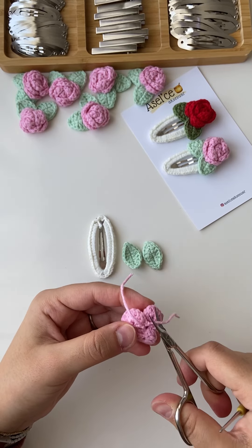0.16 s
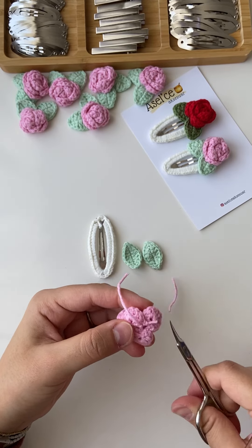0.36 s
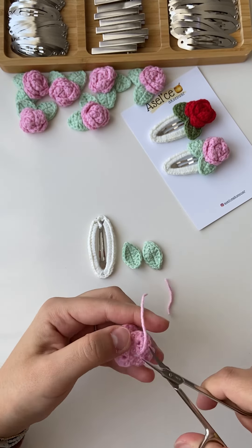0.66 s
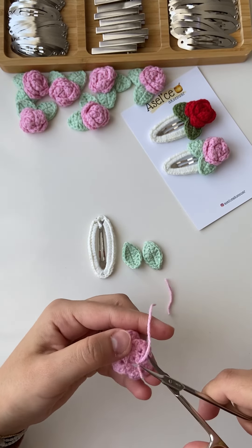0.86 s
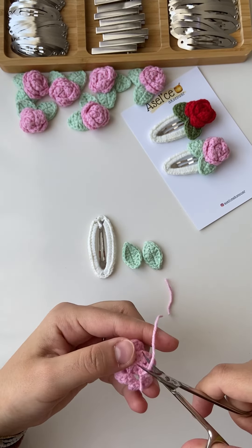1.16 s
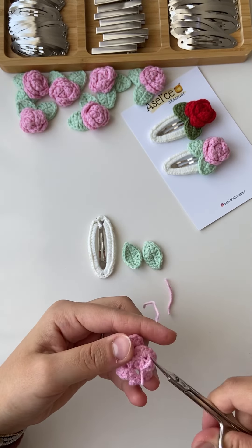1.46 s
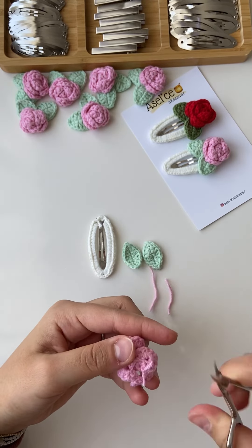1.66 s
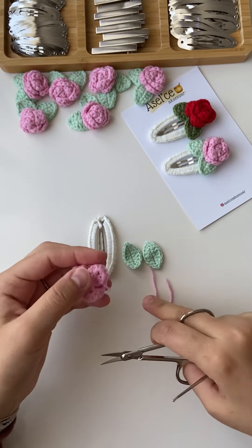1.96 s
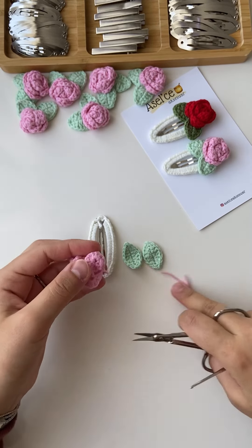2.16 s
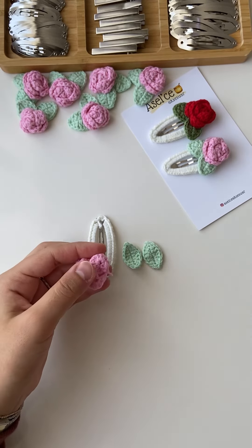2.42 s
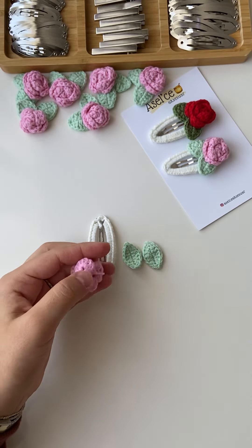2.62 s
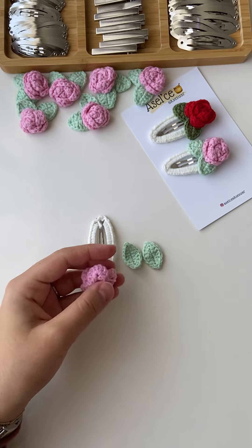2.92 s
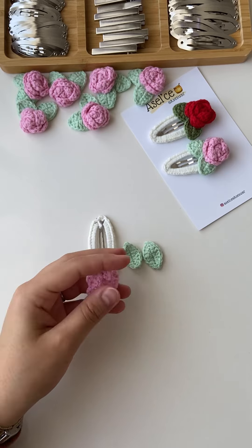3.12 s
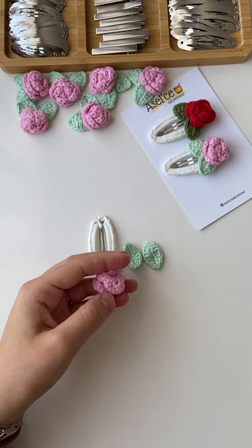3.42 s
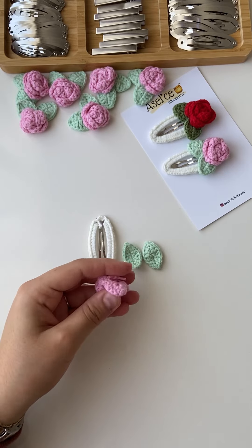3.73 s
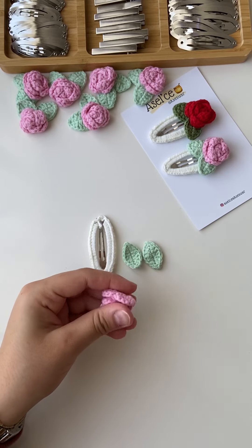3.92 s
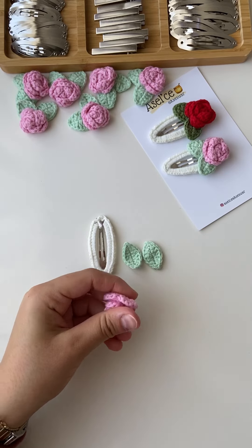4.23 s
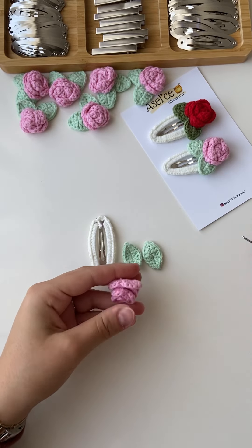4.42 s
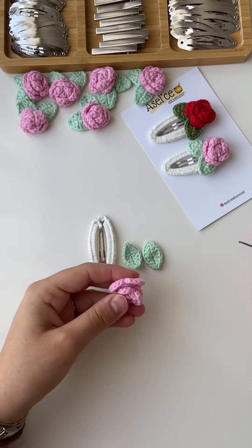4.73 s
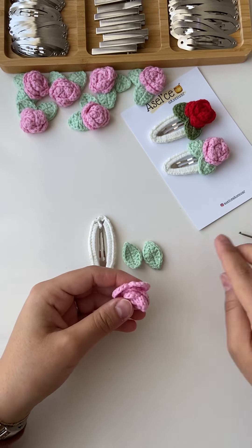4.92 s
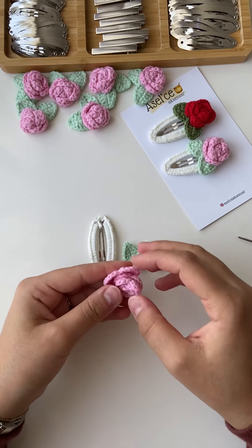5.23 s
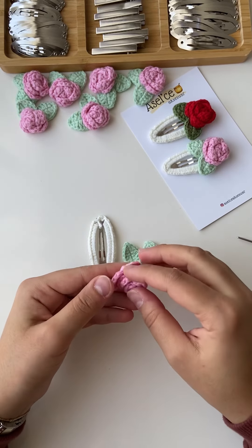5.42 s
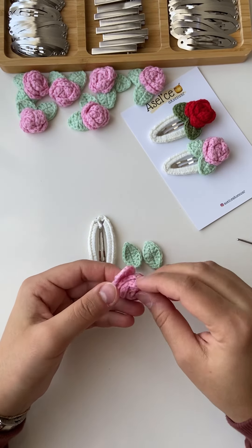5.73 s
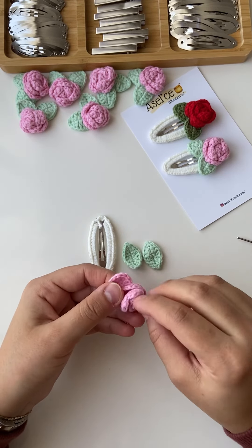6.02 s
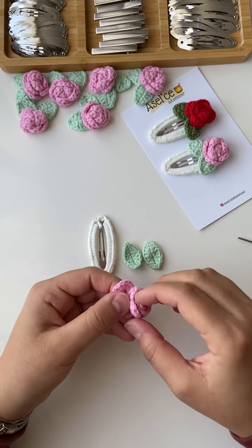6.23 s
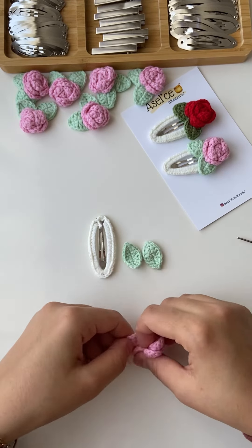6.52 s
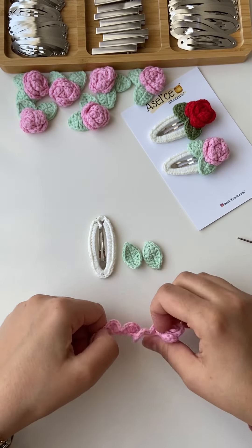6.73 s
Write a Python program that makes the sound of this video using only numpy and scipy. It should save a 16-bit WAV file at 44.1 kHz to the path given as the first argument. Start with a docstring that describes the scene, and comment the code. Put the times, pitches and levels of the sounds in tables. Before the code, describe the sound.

Two crisp close scissor snips, a soft sweep of scraps, a sharp metallic clatter on a tabletop, then quiet fibre rubbing above low rumble.

```python
"""Over a low hum and a far rumble throughout, small steel scissors snip two yarn ends close under the microphones.
A hand sweeps the scraps away, the scissors clatter down on a table, and fingers handle crocheted yarn.
Snips, rubs and drags are shaped noise; blows add noise bursts, a falling sweep and decaying steel and table modes.
A small room answers, and two microphone ports hear the treble with a phase lag between them."""
import sys
import numpy as np
from scipy import signal
from scipy.fft import rfft, irfft
from scipy.io import wavfile

SR = 44100
rng = np.random.default_rng(int(sys.argv[2]) if len(sys.argv) > 2 else 0)


def wav_record(signal):
    """Record a signal, one row per channel, as 16-bit PCM in the file named by sys.argv[1]."""
    frames = np.transpose(np.atleast_2d(signal))
    bounded = np.clip(frames, -1, 1)
    # unit amplitude maps onto the largest positive 16-bit level
    quanta = np.round(bounded * 32767).astype(np.int16)
    wavfile.write(sys.argv[1], SR, quanta)


N = 302967  # samples, about 6.87 s


def gain_of(db):
    """Amplitude factor of a level in dB."""
    return 10 ** (np.asarray(db) / 20)


def evened(x):
    """Scale to an rms of one over both channels."""
    return x / np.sqrt(np.mean(x ** 2) + 1e-30)


def read(points, hz):
    """Read a (frequency, value) table along a logarithmic frequency axis."""
    f, value = np.transpose(points)
    return np.interp(np.log(hz + 1), np.log(f + 1), value)


def noise(colour, grain_db=0., per_s=3000):
    """Two unrelated streams of one colour; grain_db makes them a crackle of uneven fibre slips."""
    slip_size = gain_of(grain_db * np.minimum(rng.exponential(1, N), 5))
    slips = slip_size * (rng.random(N) < per_s / SR)
    x = rng.standard_normal((2, N)) * (0.5 + slips * (grain_db > 0))
    hz = np.fft.rfftfreq(N, 1 / SR)
    below = (colour[0][0] / 2, colour[0][1] - 40)
    above = (colour[-1][0] * 2, colour[-1][1] - 60)
    closed = [below, *colour, above]
    return evened(irfft(rfft(x) * gain_of(read(closed, hz)), N))


def band(hz, width_hz):
    """Noise through one resonance: a wavering tone."""
    f = np.fft.rfftfreq(N, 1 / SR)
    resonance = 1 / (1 + (2 * (f - hz) / width_hz) ** 2)
    return evened(irfft(rfft(rng.standard_normal((2, N))) * resonance, N))


def resonate(x, hz, width_hz):
    """One resonance: shift its pitch down to zero, smooth, and shift back."""
    turn = np.exp(2j * np.pi * np.cumsum(hz * np.ones(x.shape[-1])) / SR)
    r = np.exp(-np.pi * width_hz / SR)
    smoothed = signal.lfilter([1 - r], [1, -r], x / turn)
    return evened((turn * smoothed).real)


def flutter(per_s, depth_db):
    """Random wobble of level, drawn per_s times a second and joined by straight lines in dB."""
    steps = rng.standard_normal(int(N / SR * per_s) + 2)
    return gain_of(depth_db * np.interp(np.arange(N) / SR * per_s, np.arange(len(steps)), steps))


def curve(rows, order):
    """Gain along one dB column of a timed table, silent outside it."""
    rows = np.array(rows)
    return gain_of(np.interp(np.arange(N) / SR, rows[:, 0], rows[:, order], -200, -200))


def swells(s, db, rise, hold, fall):
    """Sum of rise-hold-fall gains; full level starts at s, rise and fall are the seconds for 20 dB."""
    t = np.arange(0, N / SR + .002, .0005)[:, None]
    before = np.maximum(s - t, 0) / abs(rise)
    after = np.maximum(t - s - abs(hold), 0) / abs(fall)
    gains = gain_of(db - np.minimum(20 * (before + after), 200))
    return np.interp(np.arange(N) / SR, t[:, 0], gains.sum(1))


def blow(t, rise, t60):
    """Quick rise (time constant [s]), exponential fall (60 dB in t60 [s])."""
    return (1 - np.exp(-t / rise)) ** 2 * gain_of(-60 * t / t60)


def burst(shape, rough):
    """Noise under a shape, holding the energy of the shape."""
    x = shape * rough
    return x * np.linalg.norm(shape) / np.linalg.norm(x, axis=1, keepdims=True)


# the place behind the table: (time [s], rumble level [dB], far wash level [dB])
BACKGROUND = [(0, -58, -74.5), (0.35, -49, -71.5), (0.6, -50.5, -78.5), (0.9, -46.5, -75),
              (1.15, -55.5, -78), (1.5, -53, -67), (1.9, -54, -74.5), (2.85, -60, -80), (3.45, -57, -67.5),
              (4.2, -57, -74.5), (4.45, -58, -73), (4.62, -48, -65.5), (5.0, -53, -66), (5.7, -50.5, -70.5),
              (5.95, -58.5, -73.5), (6.3, -54.5, -76.5), (6.55, -61, -79.5), (6.87, -57, -74)]
# colours of rumble, wash and hiss: (frequency [Hz], relative level [dB per Hz])
RUMBLE_COLOUR = [(40, -18), (60, -2.5), (82, 2.5), (115, -6.5), (185, -9.5), (260, -22.5), (400, -38.5)]
WASH_COLOUR = [(150, -11.5), (300, 3.5), (850, -4), (1100, -19), (2000, -36)]
HISS_COLOUR = [(700, 5), (2500, 3), (5000, -0.5), (12500, -6), (14000, -19), (16500, -14.5)]
HUM_HZ, HUM_WIDTH_HZ = 36, 4
HUM_DB, HISS_DB = -59, -86.5


def behind():
    """Narrow-band noise hums; fluttering noise makes lumpy rumble and far wash, steady noise a faint hiss."""
    hum = gain_of(HUM_DB) * band(HUM_HZ, HUM_WIDTH_HZ)
    rumble = curve(BACKGROUND, order=1) * flutter(14, 2.6) * noise(RUMBLE_COLOUR)
    wash = curve(BACKGROUND, order=2) * flutter(14, 2.2) * noise(WASH_COLOUR)
    return hum + rumble + wash + gain_of(HISS_DB) * noise(HISS_COLOUR)


# how long the small room answers: (frequency [Hz], time to die 60 dB [s])
ROOM_DECAY = [(100, 0.54), (250, 0.42), (500, 0.23), (2200, 0.36), (6000, 0.2), (12000, 0.15)]


def room(x):
    """Sparse taps of random sign swell in quickly, each band then dying at its own speed."""
    taps = np.zeros((2, SR // 2))
    jitter = rng.integers(0, 20, (2, (SR // 2 - 161) // 20))
    at = np.arange(160, SR // 2 - 20, 20) + jitter  # one tap in every 20 samples
    np.put_along_axis(taps, at, rng.choice([-1., 1.], at.shape), 1)
    hz, t, z = signal.stft(taps, SR, nperseg=256)
    swell = 1 - np.exp(-t / 0.0019)
    decay = gain_of(-60 * t / read(ROOM_DECAY, hz)[:, None])
    tail = signal.istft(z * swell * decay, SR, nperseg=256)[1]
    return signal.fftconvolve(x, tail / np.linalg.norm(tail[0]), axes=1)[:, :N]


# things dragged over the table:
# (start of full level [s], hold [s], scrape level [dB], pitch [Hz], time to die 20 dB [s])
SCRAPES = [(2.31, .2, -81, 1400, .04), (1.555, .04, -72, 1150, .06), (3.1, .035, -60, 400, .04),
           (3.482, .11, -66, 2000, .08), (3.61, .05, -66, 1550, .06), (4.62, .025, -70, 2300, .03),
           (4.724, .012, -65, 930, .03)]
DRAG_RISE_S = 0.02  # s for 20 dB
SCRAPE_RING_SHARE, SCRAPE_RING_WIDTH_HZ = .7, 70  # a dragged thing rings the steel modes
SCRAPE_WIDTH_SHARE = .4  # width of each resonance over its pitch


def dragging():
    """Rough slips ring the steel and pass a broad resonance whose pitch is set by the thing dragged."""
    slips = flutter(70, 3.9) * noise([(300, 1), (3000, 0)], 5., 500)
    ringing = evened(sum(resonate(slips, hz, SCRAPE_RING_WIDTH_HZ) for hz, *_ in STEEL_MODES))
    slips = (1 - SCRAPE_RING_SHARE) * slips + SCRAPE_RING_SHARE * ringing
    out = np.zeros((2, N))
    for s, hold, db, hz, fall in SCRAPES:
        width_hz = SCRAPE_WIDTH_SHARE * hz
        scrape = resonate(resonate(slips, hz, width_hz), hz, width_hz)
        out += swells(s, db, DRAG_RISE_S, hold, fall) * scrape
    return out


# fingers brushing yarn, close by: (peak time [s], rustle level [dB], length [s])
BRUSHES = [(0.558, -78, 0.1), (2.775, -75.5, 0.015), (3.538, -69.5, 0.13), (5.016, -80, 0.35),
           (5.354, -81.5, .1), (5.56, -82, 0.12), (5.66, -78, .16), (5.773, -78, 0.085), (5.925, -77, 0.11),
           (6.133, -75.5, 0.057), (6.278, -76.5, 0.13), (6.35, -69, 0.18), (6.411, -70, 0.13),
           (6.515, -75.5, 0.17), (6.675, -64, 0.12), (6.76, -73.5, 0.3)]
# the hand sweeping scraps over the table: (time [s], rustle level [dB])
SCRAP_SWEEP = [(2.08, -100), (2.15, -83), (2.25, -77.5), (2.33, -72), (2.46, -69.5), (2.515, -66.5),
               (2.55, -86.5), (2.72, -104)]
# colour of the rustle: (frequency [Hz], relative level [dB per Hz])
RUSTLE_COLOUR = [(2000, -5.5), (4200, -6), (5300, -0.5), (7500, -4), (10400, -2), (14500, -3),
                 (16000, -2.5)]
RUB_RISE_SHARE = 0.71  # share of a brush spent rising; each end lies 20 dB under the peak


def rubbing():
    """Fibres slip over skin and table in a slightly uneven rustle."""
    fibres = flutter(60, 2.4) * noise(RUSTLE_COLOUR, 4., 1500)
    s, db, length = np.transpose(BRUSHES)
    brushes = swells(s, db, RUB_RISE_SHARE * length, 0, (1 - RUB_RISE_SHARE) * length)
    return (brushes + curve(SCRAP_SWEEP, order=1)) * fibres


# light clicks of blades, rings and nails, close by: (time [s], level [dB], pitch [Hz])
SMALL_CLICKS = [(0.2843, -29, 9700), (1.378, -41.5, 6270), (1.493, -55, 6200), (2.479, -38.5, 11300),
                (3.091, -56, 12300), (3.1066, -48.5, 12500), (4.036, -56, 943), (4.78, -18.5, 10550),
                (4.972, -57.5, 1803), (5.107, -67.5, 1600), (5.21, -65, 1699), (6.669, -42.5, 5120),
                (6.669, -56.5, 2166)]


def clicks():
    """A few milliseconds of noise, coloured by the small part that is touched; low parts ring longer."""
    t, out = np.arange(3000) / SR, np.zeros((2, N + SR))
    for s, db, hz in SMALL_CLICKS:
        white = rng.standard_normal((2, len(t) + 1))
        part = resonate(resonate(white[:, 1:], hz, 0.17 * hz), hz, 0.17 * hz)
        edge = 0.73 * np.diff(white) * min(hz / 6000, 1) ** 2  # treble noise, less for low parts
        shape = blow(t, 0.00063, 0.0033 + 30 / hz)
        out[:, round(s * SR):][:, :len(t)] += gain_of(db) * burst(shape, part + edge)
    return out[:, :N]


# blades shearing and reopening, close under the microphones: (start [s], length [s], hiss level [dB],
# squeak peak time [s], pivot squeak level [dB], squeak pitch [Hz])
BLADE_STROKES = [(0.237, .014, -57, 0.256, -58, 1560), (0.403, .016, -81, 0.412, -66, 1600),
                 (1.313, .026, -62, 1.347, -69, 1260), (1.492, .017, -80, 1.501, -69, 1620)]
# colour of the shearing hiss: (frequency [Hz], relative level [dB per Hz])
SHEAR_COLOUR = [(1300, -37), (5000, -21.5), (7000, -10), (12500, -10), (16000, -15)]
BITE_S, CUT_S = 0.0035, 0.0021  # s for the hiss to rise and to drop by 20 dB
SLIDE_DB, SLIDE_S, SLIDE_END_S = -12, 0.012, 0.014  # after the cut the bare blades slide on, softer
SQUEAK_RISE_S, SQUEAK_FALL_S = 0.016, 0.016  # s for 20 dB
PIVOT_WIDTH_HZ = 300


def snips():
    """Steel edges grind through fibres as grainy noise while the pivot squeaks as resonant noise."""
    grind = noise(SHEAR_COLOUR, 1.5, 9000)
    s, length, hiss_db = np.transpose(BLADE_STROKES)[:3]
    cut = swells(s, hiss_db, BITE_S, length, CUT_S)
    slide = swells(s + length, hiss_db + SLIDE_DB, CUT_S, SLIDE_S, SLIDE_END_S)
    squeaks = sum(swells(at, db, SQUEAK_RISE_S, 0, SQUEAK_FALL_S) * band(hz, PIVOT_WIDTH_HZ)
                  for *_, at, db, hz in BLADE_STROKES)
    return (cut + slide) * grind + squeaks


def ring(modes, t, spread_db, rise_cycles, near_hz, focus_db):
    """Modes of a struck thing, weaker away from near_hz by focus_db per octave, a little different each blow."""
    hz, db, t60 = np.transpose(modes)[:, :, None]
    db = db - focus_db * abs(np.log2(hz / near_hz))
    size, turn = rng.standard_normal((2, 2, len(modes), 1))
    build = (1 - np.exp(-t * hz / rise_cycles)) ** 2
    decay = gain_of(db + spread_db * size - 60 * t / t60)
    waves = decay * np.sin(2 * np.pi * (hz * t + turn)) * build
    return waves.sum(1) / np.linalg.norm(gain_of(db))


# knocks on the table: (time [s], crack level [dB], bright tick level [dB], body clack level [dB],
# clack pitch [Hz], table thud level [dB], thud pitch [Hz])
KNOCKS = [(1.5455, -69, -90, -55.5, 1080, -62, 500), (2.9135, -58.5, -61.5, -55, 930, -43, 118),
          (3.073, -66, -55.5, -69, 840, -46.5, 350), (3.0927, -65, -59.5, -90, 873, -41, 380),
          (3.2292, -21, -23, -22.5, 1540, -33, 396), (3.7673, -37.5, -68.5, -38.5, 960, -56.5, 400),
          (3.7774, -23, -29, -30.5, 1450, -39.5, 400), (3.7933, -53, -52, -25, 2060, -36.5, 397),
          (3.8024, -9, -18, -15, 930, -20, 289.8), (3.8075, -31.5, -38, -21.5, 1967, -29, 300),
          (3.833, -16, -17.5, -17.5, 1100, -29, 300.8), (3.8505, -24.5, -34, -20, 1980, -26.5, 261.2),
          (4.3465, -64.5, -64, -65.5, 1020, -52.5, 400), (4.575, -70, -70.5, -60, 890, -49.5, 500),
          (4.5986, -61, -71.5, -48, 1570, -55, 300), (4.7599, -58, -60, -45.5, 934, -31, 299.7),
          (4.78, -51.5, -56.5, -40.5, 1436, -36, 417), (4.8059, -76, -67, -49.5, 1430, -33, 452),
          (4.8251, -69.5, -79.5, -45, 1070, -38.5, 430), (4.8374, -83, -84.5, -55.5, 953, -35.5, 420),
          (4.861, -80, -86, -60, 1186, -38.5, 404)]
# colours of crack and tick: (frequency [Hz], relative level [dB per Hz])
CRACK_COLOUR = [(1500, -11.5), (2800, 3), (4400, 0.5), (6000, 2), (7000, -3), (9000, -9)]
TICK_COLOUR = [(6000, -18.5), (7500, -9), (10300, 3.5), (12500, -2.5), (14500, 6.5), (16500, -1.5)]
# modes of the scissors and of the table: (frequency [Hz], relative level [dB], time to die 60 dB [s])
STEEL_MODES = [(959.6, -3.5, .045), (1170, -6, 0.035), (1441, -4.5, .05), (1742, -5.5, .04),
               (2040, -3, 0.036), (2320, -2, 0.054), (2786, -7.5, 0.058), (3955, -5.5, 0.066),
               (4370, -4.5, 0.092), (4910, -5, .04), (5770, 4, 0.024)]
TABLE_MODES = [(74, -4, 0.12), (124, -2, 0.16), (199.8, -11, 0.051), (290, 1.5, 0.02), (414, -0.5, 0.045),
               (552, -0.5, 0.044)]
STEEL_SPREAD_DB, TABLE_SPREAD_DB = 3, 2
STEEL_RISE_CYCLES, TABLE_RISE_CYCLES = 0.98, 1.2  # a mode takes a few cycles to build
STEEL_FOCUS_DB, TABLE_FOCUS_DB = 40.5, 6.5  # dB lost per octave away from the pitch of the blow
STEEL_SHARE = .52  # steel ring added to the crack
CLACK_RING_SHARE = 0.6  # the clack rings the steel modes near its own pitch
# bending waves cross the table treble first: pitch = cycles / (time + start)
BEND_CYCLES, BEND_START_S = 2.1, .002
BEND_LIFE_CYCLES = 15  # cycles of the thud pitch to die 60 dB
BEND_DB = 1.5  # level of the bending waves, added to the ring of the table


def hits():
    """Tick and crack rise first, the body clacks a little later, a thud sweeps down, steel and table ring on."""
    t, out = np.arange(SR // 4) / SR, np.zeros((2, N + SR))
    crack_noise, tick_noise = noise(CRACK_COLOUR), noise(TICK_COLOUR)
    sweep = np.sin(2 * np.pi * BEND_CYCLES * np.log(1 + t / BEND_START_S))
    for s, crack_db, tick_db, clack_db, clack_hz, thud_db, thud_hz in KNOCKS:
        part = slice(round(s * SR), round(s * SR) + len(t))
        span = slice(part.start // 2, part.start // 2 + len(t))  # stretch of noise used for this blow
        steel = ring(STEEL_MODES, t, STEEL_SPREAD_DB, STEEL_RISE_CYCLES, clack_hz, 0)
        crack = burst(blow(t, 0.0007, 0.023), crack_noise[:, span]) + STEEL_SHARE * steel
        tick = burst(blow(t, 0.00027, 0.017), tick_noise[:, span])

        white = rng.standard_normal((2, len(t)))
        body = resonate(resonate(white, clack_hz, 1.7 * clack_hz), clack_hz, 1.7 * clack_hz)
        near = ring(STEEL_MODES, t, STEEL_SPREAD_DB, STEEL_RISE_CYCLES, clack_hz, STEEL_FOCUS_DB)
        clack = burst(blow(t, 0.00093, 0.032), body) + CLACK_RING_SHARE * near

        bend = gain_of(BEND_DB) * blow(t, 0.00086, BEND_LIFE_CYCLES / thud_hz) * sweep
        thud = bend + ring(TABLE_MODES, t, TABLE_SPREAD_DB, TABLE_RISE_CYCLES, thud_hz, TABLE_FOCUS_DB)
        out[:, part] += gain_of(crack_db) * crack + gain_of(tick_db) * tick
        out[:, part] += gain_of(clack_db) * clack + gain_of(thud_db) * thud
    return out[:, :N]


ROOM_DB, HANDS_ROOM_DB = -8, -15.5  # sent to the room by the table and by the hands


def scene():
    """Hands close under the microphones send less to the room than the table does."""
    hands = snips() + clicks() + rubbing()
    table = hits() + dragging()
    sent = gain_of(HANDS_ROOM_DB) * hands + gain_of(ROOM_DB) * table
    return hands + table + room(sent) + behind()


# the sound falls off steeply near 16 kHz: (frequency [Hz], level [dB])
TOP_FALL = [(15500, 0.5), (16100, -21.5)]
# how alike the two ports hear: (frequency [Hz], likeness [0 to 1])
PORT_LIKENESS = [(120, 1), (330, 0.94), (640, 0.37), (1400, 1), (2800, .75), (7000, 1), (16000, 0.92)]
# phase between the ports: (frequency [Hz], lead of the left port [radians])
PORT_LEAD = [(110, .12), (200, .33), (340, 1.3), (760, 2.3), (1050, 0.73), (1800, 1.5), (3100, 1.6),
             (5200, 0.94), (6500, 2.2), (8300, 3.97), (10400, 6), (13500, 9), (16500, 14)]
NO_LEAD = (0, 0)  # the deepest bass reaches both ports together
EDGE_HZ = 16700  # band limit


def record(dry):
    """The ports share the bass and, with a phase lag, the treble; then the band limit."""
    hz = np.fft.rfftfreq(N, 1 / SR)
    a, b = rfft(dry) * gain_of(read(TOP_FALL, hz))
    same = np.clip(read(PORT_LIKENESS, hz), -1, 1)
    lead = np.interp(hz, *np.transpose([NO_LEAD, *PORT_LEAD]))
    left = gain_of(0.5) * a * np.exp(1j * lead)
    right = same * a + np.sqrt(1 - same ** 2) * b
    ports = irfft([left, right], N)
    band_limit = signal.firwin(511, EDGE_HZ, window=("kaiser", 9), fs=SR)
    return signal.oaconvolve(ports, band_limit[None], "same")


dry = scene()
out = record(dry)
wav_record(out)
```